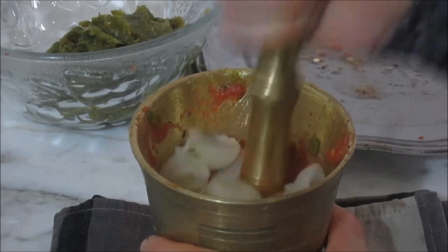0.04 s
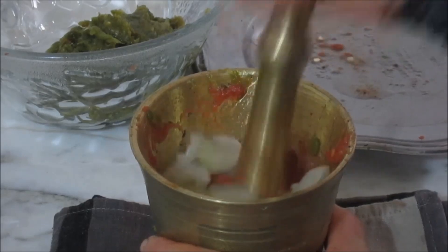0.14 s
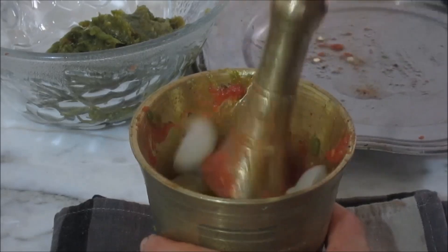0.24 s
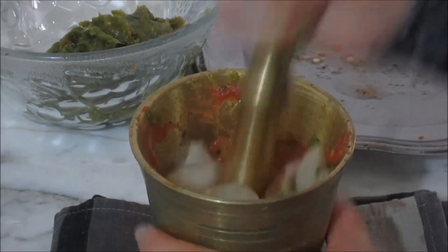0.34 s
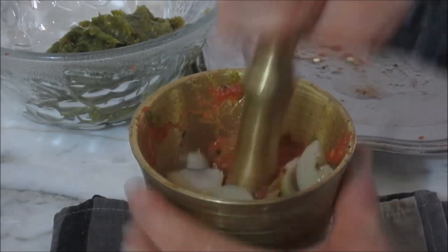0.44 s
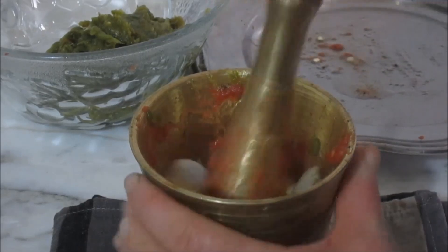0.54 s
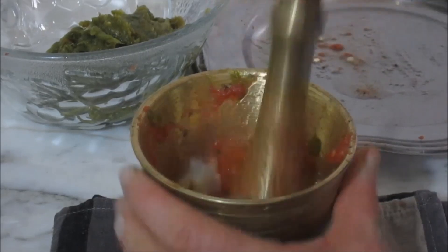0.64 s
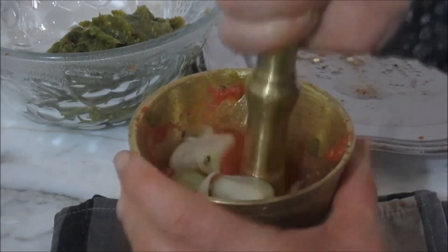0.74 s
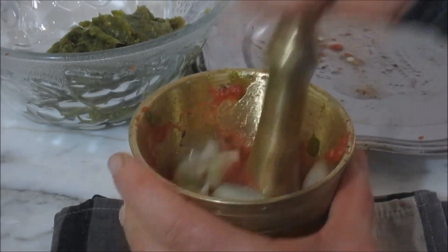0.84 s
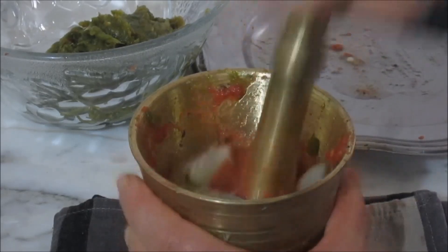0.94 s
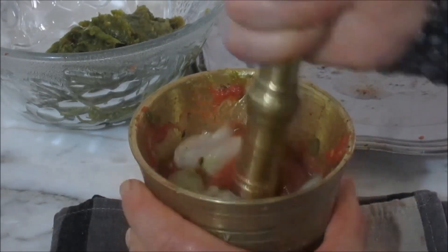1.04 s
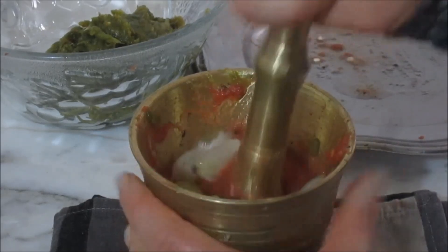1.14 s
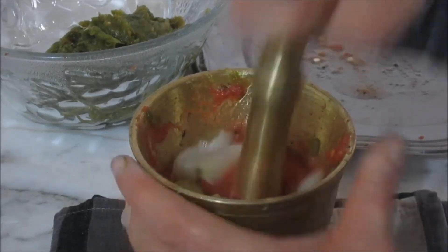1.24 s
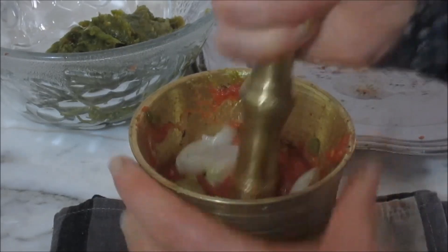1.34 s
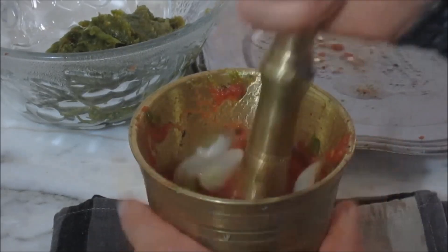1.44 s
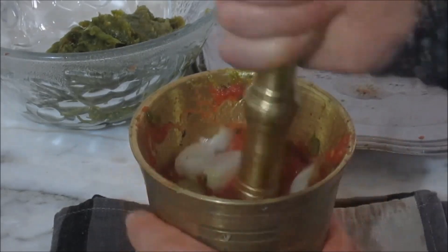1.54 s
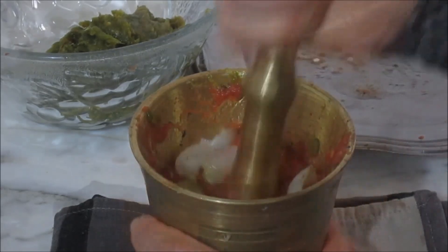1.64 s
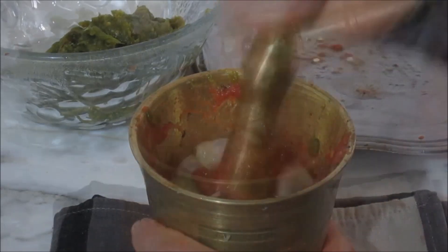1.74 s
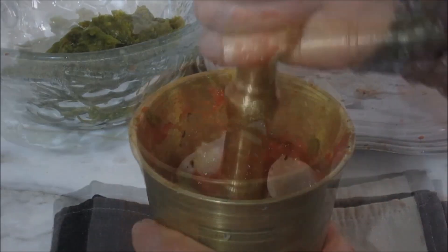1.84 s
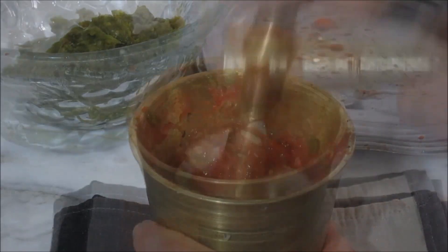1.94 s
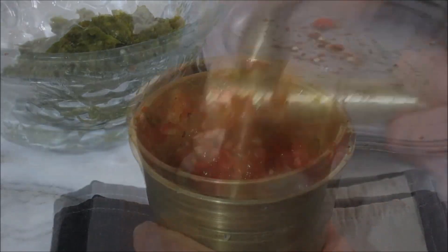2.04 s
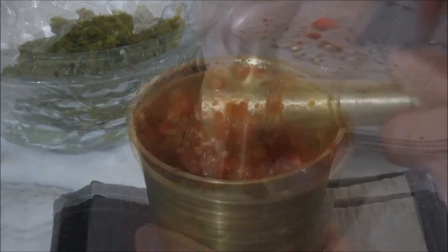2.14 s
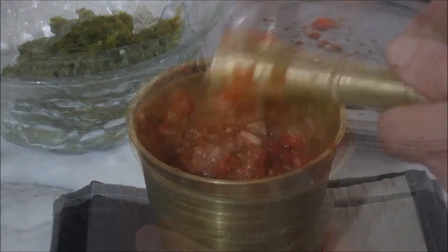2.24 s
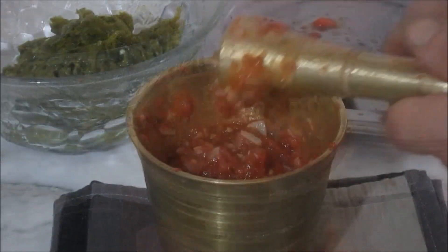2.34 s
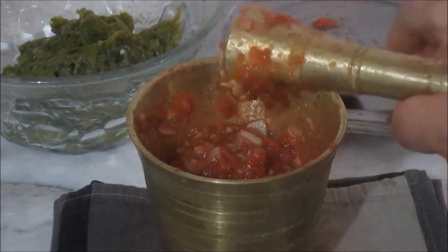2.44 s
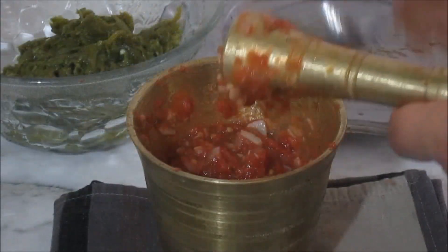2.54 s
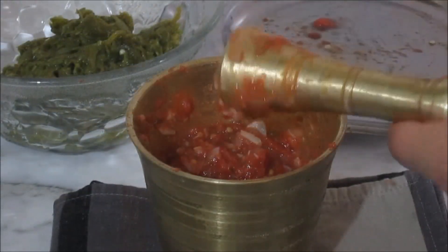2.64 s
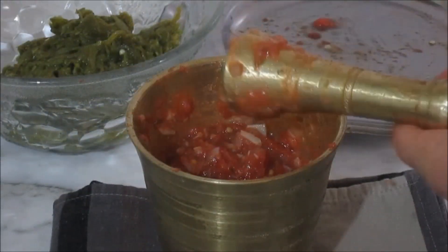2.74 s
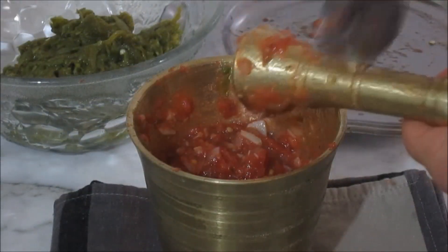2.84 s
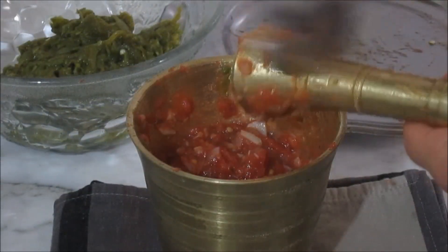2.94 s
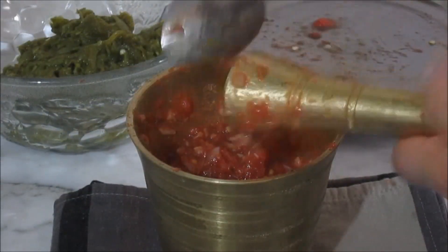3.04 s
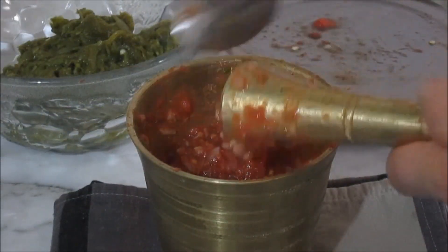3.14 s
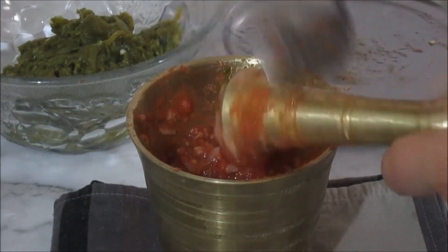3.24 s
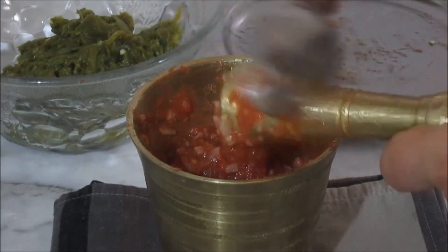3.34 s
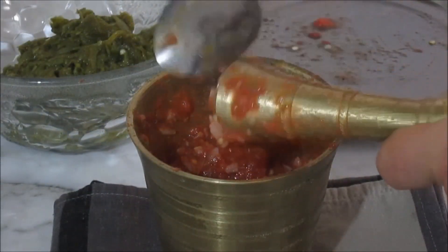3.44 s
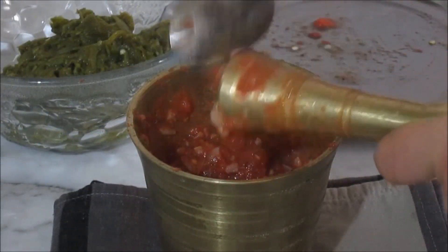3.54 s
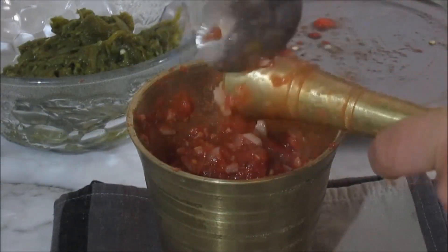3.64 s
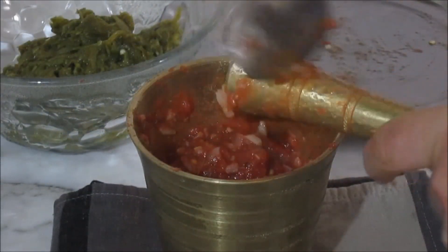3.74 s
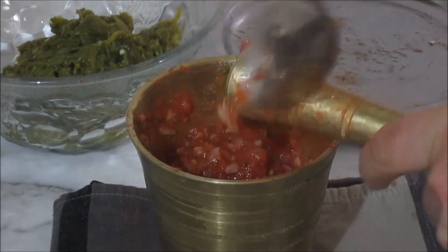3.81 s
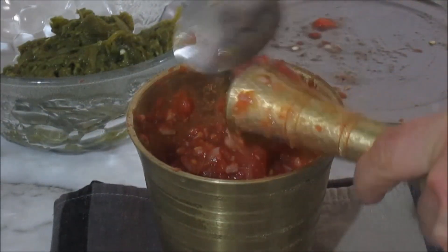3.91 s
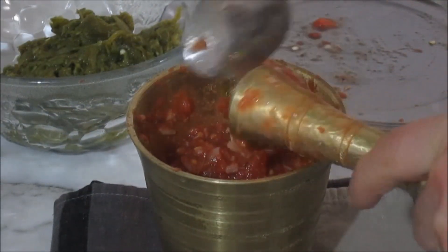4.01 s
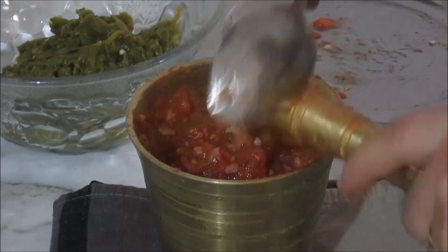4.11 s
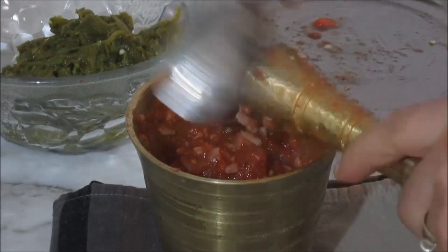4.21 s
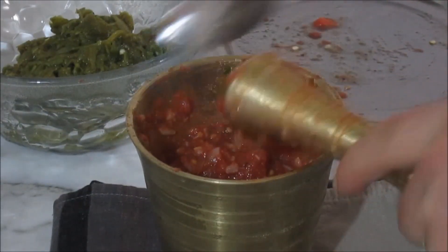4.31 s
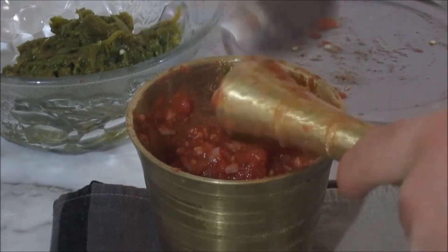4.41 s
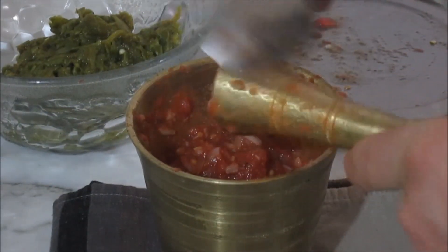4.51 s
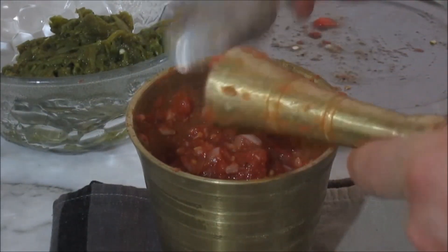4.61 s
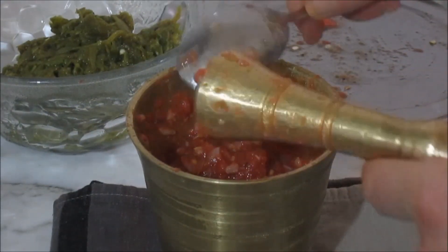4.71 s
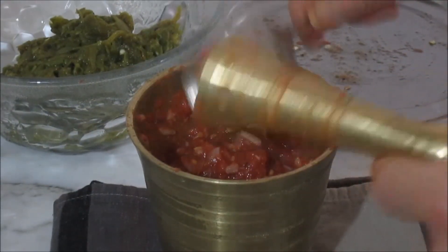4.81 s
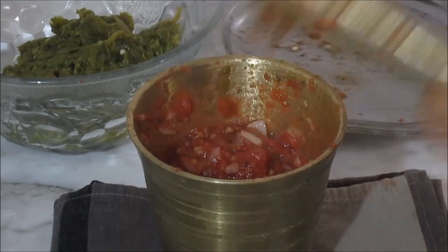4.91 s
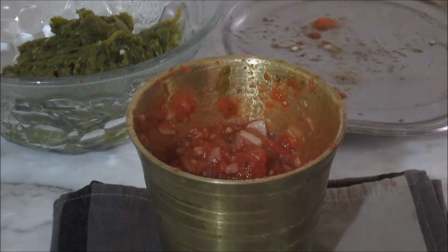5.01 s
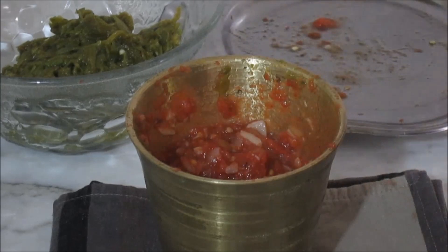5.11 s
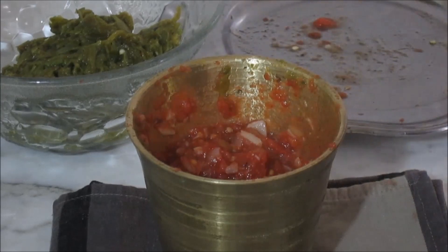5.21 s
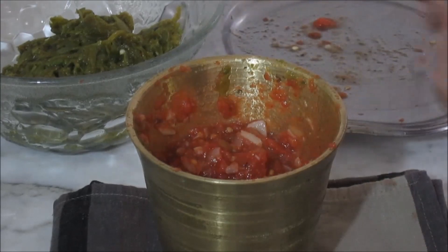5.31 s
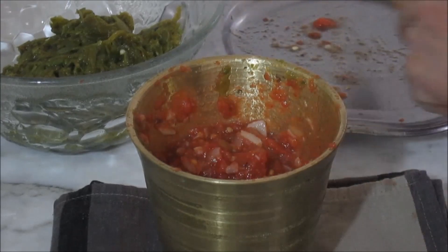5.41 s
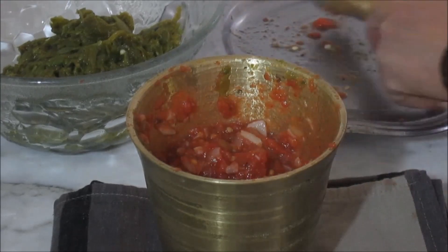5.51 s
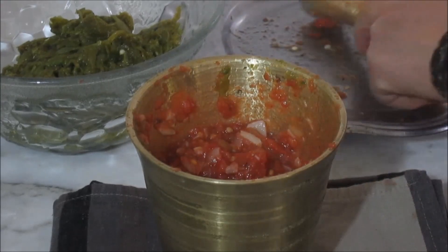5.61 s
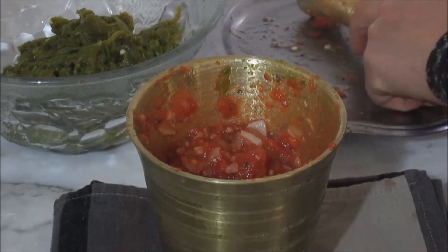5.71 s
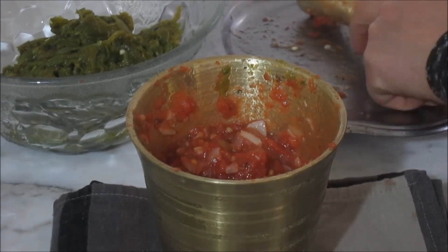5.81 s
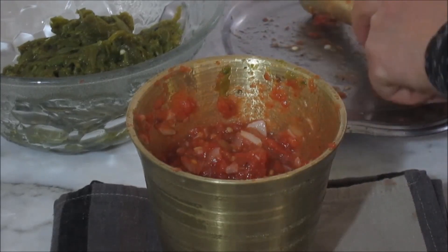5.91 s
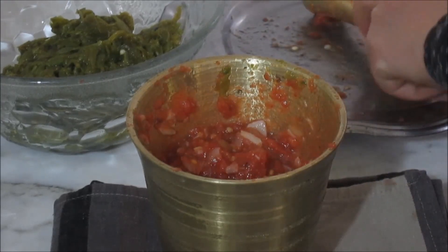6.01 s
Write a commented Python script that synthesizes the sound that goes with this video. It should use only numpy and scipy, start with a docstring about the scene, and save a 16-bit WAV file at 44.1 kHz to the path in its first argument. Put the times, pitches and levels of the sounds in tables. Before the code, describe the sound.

A brass pestle pounds vegetables in a brass mortar, giving about eight short, damped metallic knocks at a steady pace. After a momentary dip in level, the kitchen sounds closer, with a louder low appliance rumble. A spoon taps and scrapes the pestle in bright, irregular clinks with a brief squeak. Following a pause, the pestle lands on a steel tray with a short, ringing clatter.

```python
"""Mortar and pestle in a kitchen

A brass pestle pounds vegetables in a brass mortar on a cloth; after a brief dip in level the kitchen
is heard closer. A spoon taps and scrapes the pestle clean, and the pestle is laid on a steel tray that
clatters. Impact and friction excite the damped normal modes of each metal body, which sound into a
hard, reverberant room over a low appliance rumble."""
import sys
import numpy as np
from scipy import signal
from scipy.fft import rfft, irfft
from scipy.io import wavfile

SR = 44100
rng = np.random.default_rng(int(sys.argv[2]) if len(sys.argv) > 2 else 0)


def generate_wav(signal):
    """Clip the signal to [-1, 1] and save it as 16-bit WAV at the path in sys.argv[1]."""
    frames = np.transpose(np.atleast_2d(signal))
    scaled = np.clip(frames, -1, 1) * 32767
    pcm = np.round(scaled).astype(np.int16)
    wavfile.write(sys.argv[1], SR, pcm)


N = 267246
T = np.arange(N) / SR
CLOSER_S = 2.566  # end of the dip in level

# Modes of pestle and spoon ringing free. Each row: frequency in Hz, level in dB, T60 in seconds.
FREE_MODES = [(1120, 5, 0.016), (1967, 0.5, 0.041), (2730, -1, 0.0043), (2940, 0.5, 0.037),
              (3003, 9, 0.014), (3540, -5, 0.042), (4115, 5.5, 0.009), (4867, 3, 0.03), (5460, -4, 0.043),
              (5570, -3.5, 0.045), (6800, -11, 0.024), (7180, -8, 0.011), (8800, 7.5, 0.027),
              (9820, 3.5, 0.017), (11500, -22, 0.011), (12160, -10, 0.028), (13400, -10, 0.023),
              (14900, -45, .06)]
FREE_EDGES_HZ = [700, 2300, 4000, 7200]  # lower edges of the low, main, upper and top bands
# The weak, close modes of a body blur into a crack. Each entry: four band levels in dB against the
# clear modes, T60 in seconds, roll-off in Hz.
CRACKS = {"mortar": ([-2.3, -2.2, -2.9, -2.2], 0.0069, 4360), "rim": ([-2, -2, 12, 5], 0.024, 7500),
          "spoon": ([1.7, 3.4, 2.7, 0.83], 0.0021, 12900), "tray": ([0.5, -8, 2, 0], 0.098, 6400)}


def pestle():
    """Impact excitation: blows ring the damped mortar; light touches of metal tick faintly."""
    # The half-full mortar. Each row: frequency in Hz, level in dB, T60 in seconds.
    modes = [(227, -15.5, 0.031), (385, -11, 0.035), (488.6, -1, 0.03), (539, -8, 0.1), (650, -2.5, 0.014),
             (993, -2, 0.037), (1074, -2, 0.041), (1174.5, -0.5, 0.056), (1265, -0.5, .04),
             (1357, -4, 0.041), (1428, -3, 0.022), (1950, -8, 0.036), (2105, -4.5, 0.039),
             (2500, 4.5, 0.009), (2777, 0, 0.018), (3500, -12, 0.008), (4340, -17.5, 0.012),
             (5540, -5, 0.024), (6040, -0.8, 0.04), (6660, -1, 0.014), (7600, -7, 0.041),
             (8050, -10, 0.042), (10500, -28, .04), (13100, -36, .03)]
    # Each row: start in seconds, main-band peak in dB, then low, upper and top bands in dB against it.
    blows = [(0.049, -7.5, -1.5, -12, -17.5), (0.377, -7.5, 1, -6, -21), (0.695, -11.5, -17, -12.5, -35),
             (1.268, -5.5, 1.5, -11, -19), (1.538, -7, 2.5, -6, -13), (1.805, -9.5, -1.5, -13, -24.5),
             (2.077, -9, -1.5, -18, -34), (2.323, -8, 2.5, -1.5, -13.5)]
    touches = [(0.303, -43, -20, -7, -16), (0.341, -39.5, -24, -4.5, -4.5), (0.613, -48, -9, -2, -7),
               (0.642, -45, -25, -26, -31), (0.926, -34.5, -31, -17, -21), (5.355, -34.5, -22, 0.5, 2)]
    glances = [(0.695, -37.5, -16, 7, -5), (2.322, -22.5, -5, 5.5, -7)]
    # The pestle drags along the wall. Each row: start in seconds, hold in seconds, level in dB.
    drags = [(2.24, .03, -61), (2.275, 0.033, -49.5)]
    edges_hz = [300, 800, 1900, 4000]
    bowl, light_contact = (modes, edges_hz, CRACKS["mortar"]), (modes, edges_hz, CRACKS["rim"])
    out = impacts(blows, bowl, scatter_db=1.97, detune=0.017)
    out += impacts(touches, light_contact, scatter_db=3.5, detune=0.038)
    out += friction(drags, light_contact, bands_db=[-16, -8, 5, -8], slips_per_s=1500, spread_db=3.1,
                    scatter_db=3.1, detune=0.0073)
    free_pestle = FREE_MODES, FREE_EDGES_HZ, CRACKS["spoon"]  # glancing blows ring the pestle itself
    return out + impacts(glances, free_pestle, scatter_db=5.1, detune=0.041)


def spoon(low_band_db=-12):
    """Free vibration: spoon and pestle ring together under taps and scrapes."""
    # Each row: start in seconds, main-band peak in dB, then upper and top bands in dB against it.
    taps = [(2.879, -6.5, 3.5, -7.5), (2.9053, -15, 5.5, -4), (2.9628, -16.5, 4.5, -12),
            (2.9714, -16.5, 4, -13), (2.9772, -25, -2, -14), (2.998, -18, -2, -10), (3.0093, -17.5, -4, -4),
            (3.2957, -7.5, 3.5, -4.5), (3.3081, -18, 6, -16), (3.3901, -13.5, -5, -3.5),
            (3.3981, -12, 4.5, -12), (3.5141, -15.5, 3, -7.5), (3.8193, -11.5, 8.5, -3.5),
            (3.8507, -16, 2.5, -8), (3.868, -12.5, 5, -5), (4.019, -20.5, -2.5, -10), (4.1651, -12, 6, -7),
            (4.5116, -11, 3, -19), (4.5201, -17, 4, -7)]
    # The spoon's edge slides along the pestle. Each row: start in seconds, hold in seconds, level in dB.
    scrapes = [(2.94, 0.066, -28), (3.298, 0.0081, -26.5), (3.38, 0.042, -23), (3.82, 0.0071, -24.5),
               (3.87, 0.055, -24.5), (4.168, 0.059, -32.5), (4.515, 0.054, -28)]
    body = FREE_MODES, FREE_EDGES_HZ, CRACKS["spoon"]
    strikes = [(start, db, low_band_db, *upper_db) for start, db, *upper_db in taps]
    tapping = impacts(strikes, body, scatter_db=1.6, detune=0.006)
    scraping = friction(scrapes, body, bands_db=[-10, 2.5, 2.5, -8], slips_per_s=1100, spread_db=5.4,
                        scatter_db=1.6, detune=0.006)
    return tapping + scraping + spoon_singing()


def spoon_singing(roughness=0.53, flutter_hz=150):
    """Friction-induced vibration: a stuttering tone whose pitch slides with the contact point."""
    # Each row: start in seconds, hold in seconds, level in dB, first and last frequency in Hz.
    glides = [(3.3, 0.15, -31, 2680, 3000), (3.297, 0.017, -29, 3400, 5100),
              (3.345, 0.021, -26, 4900, 4400), (3.82, 0.087, -41.5, 2600, 15000)]
    out = np.zeros(N)
    for start, hold, level_db, first_hz, last_hz in glides:
        times, levels_db = stroke(start, hold, level_db)
        stutter = unit_rms(signal.lfilter(*signal.butter(2, flutter_hz, fs=SR), rng.standard_normal(N)))
        envelope = undb(np.interp(T, times, levels_db, left=-200, right=-200))
        hz = np.interp(T, times[[0, -1]], [first_hz, last_hz])
        out += envelope * (1 + roughness * stutter) * np.sin(2 * np.pi * np.cumsum(hz) / SR)
    return out


def tray():
    """Plate vibration: the steel tray is struck by the pestle, then rocks and chatters under it."""
    # Each row: frequency in Hz, level in dB, T60 in seconds.
    modes = [(262, -8, .03), (362, -1, 0.1), (485, 0, 0.037), (645, 9.5, 0.02), (808, -6, 0.48),
             (972, -4, .12), (1085, -9, 0.9), (1258, 0, 0.073), (1390, 14, 0.017), (1500, 2, 0.15),
             (1550, -1.5, 0.094), (1760, -3.5, 0.17), (1887, -26, 1), (2440, 3, 0.09), (2560, 5, 0.11),
             (3130, 7, 0.037), (3603, -1, 0.16), (4470, 8, 0.081), (4550, -1.5, 0.22), (5300, 6, 0.034),
             (6010, 4, 0.06), (6440, -3, 0.092), (7660, -10, 0.12), (8800, -13, 0.088), (9330, -2, 0.036),
             (11400, -30, .05), (13200, -30, .04)]
    # Each row: start in seconds, main-band peak in dB, then low, upper and top bands in dB against it.
    drops = [(5.6397, -5.5, -13.5, -7, -9.5), (5.677, -8, -2, -32, -22), (5.687, -6.5, -10, -21, -32),
             (5.7555, -5, -21, -0.5, -4)]
    # Each row: start in seconds, hold in seconds, level in dB.
    chatter = [(5.65, 0.043, -25.5), (5.752, 0.041, -20)]
    plate = modes, [220, 900, 2100, 4000], CRACKS["tray"]
    strikes = impacts(drops, plate, scatter_db=2.1, detune=0.0015)
    return strikes + friction(chatter, plate, bands_db=[-2.5, 6, 4, -10], slips_per_s=1300,
                              spread_db=3.8, scatter_db=2.1, detune=0.0015)


def impacts(events, body, scatter_db, detune):
    """Superposition: each blow adds the four bands of the body's response with its own weights."""
    out = np.zeros(N)
    for start, db, low_db, upper_db, top_db in events:
        gains = undb(db + np.array([low_db, 0, upper_db, top_db]))
        add(out, start, gains @ impulse_response(*body, scatter_db, detune))
    return out


def friction(strokes, body, bands_db, slips_per_s, spread_db, scatter_db, detune):
    """Stick-slip excitation: clicks of random time and size are convolved with the body's response."""
    out = np.zeros(N)
    for row in strokes:
        times, levels_db = stroke(*row)
        t = np.arange(times[0], times[-1], 1 / SR)
        slips = rng.random(N)[:len(t)] < slips_per_s / SR
        size, polarity = rng.standard_normal((2, N))[:, :len(t)]
        clicks = slips * undb(spread_db * size) * np.sign(polarity)
        force = unit_rms(clicks) * undb(np.interp(t, times, levels_db))
        response = undb(bands_db) @ impulse_response(*body, scatter_db, detune)
        add(out, times[0], signal.fftconvolve(force, response / np.linalg.norm(response)))
    return out


def stroke(start, hold, db, press_s=0.0078, release_db_per_s=684, fall_db=41):
    """Contact envelope: corner times and levels in dB as a stroke presses in, holds and lets go."""
    times = start + np.cumsum([0, press_s, hold, fall_db / release_db_per_s])
    return times, db - np.array([fall_db / 2, 0, 0, fall_db])


def impulse_response(modes, edges_hz, crack, scatter_db, detune, contact_click=4.23):
    """Modal overlap: in each of four bands, clear modes ring over dense ones heard as decaying noise."""
    crack_db, t60, rolloff_hz = crack
    partials = damped_modes(modes, scatter_db, detune)
    band_of_mode = np.digitize(np.array(modes)[:, 0], edges_hz[1:])
    length = partials.shape[1]
    noise = rng.standard_normal(length) + contact_click * signal.unit_impulse(length)
    noise = signal.lfilter(*signal.butter(2, rolloff_hz, fs=SR), noise)
    noise *= 1000. ** (-T[:length] / t60)
    bands = []
    for i, limits_hz in enumerate(zip(edges_hz, edges_hz[1:] + [16000])):
        clear = unit_peak(partials[band_of_mode == i].sum(axis=0))
        blurred = unit_peak(butterworth(noise, 3, limits_hz, "bandpass"))
        bands.append(unit_peak(clear + undb(crack_db[i]) * blurred))
    return bands


def damped_modes(modes, scatter_db=0., detune=0., rise_cycles=0.58):
    """Exponential decay: one sine per mode, with optional random scatter in level and pitch."""
    hz, db, t60 = np.transpose(modes)[:, :, None]
    t = T[:int(SR * min(t60.max(), 4))]
    level, pitch, polarity = rng.standard_normal((3, len(hz), 1))
    amplitude = undb(db + scatter_db * level) * np.sign(polarity)
    envelope = 1000. ** (-t / t60) * (1 - np.exp(-t * hz / rise_cycles))
    return amplitude * np.sin(2 * np.pi * hz * (1 + detune * pitch) * t) * envelope


def kitchen(x, source, delay_s=0.0044, build_s=0.0019):
    """Reverberation: direct sound, a reflection off the counter, then dense echoes that build and fade."""
    # Each row: frequency in Hz, reverberation time T60 in seconds.
    decay_times = [(100, 0.18), (300, 0.41), (520, 0.5), (1000, 0.5), (2800, 0.48), (7300, 0.46),
                   (15000, 0.12)]
    # Each entry: a source's counter reflection, or its diffuse tail, in dB against the direct sound.
    counter_db = {"mortar": -5, "spoon": -8.5, "tray": -7}
    tail_db = {"mortar": -2, "spoon": -2, "tray": 0.5}
    direct = butterworth(x, 4, 150, "highpass")  # high-pass keeps deep bass out of the strikes
    decay_hz, decay_s = np.transpose(decay_times)
    t, tail = T[:SR], np.zeros(SR)
    for hz in 90 * 2 ** np.arange(0, 7.6, 0.5):  # half-octave bands
        t60 = np.interp(np.log(hz), np.log(decay_hz), decay_s)
        envelope = 1000. ** (-t / t60) * (1 - np.exp(-t / build_s))
        tail += np.sqrt(hz) * narrowband_noise(hz, hz / 3)[:SR] * envelope / np.linalg.norm(envelope)
    echoes = signal.fftconvolve(direct, tail / np.linalg.norm(tail))[:N]
    out = direct.copy()
    add(out, delay_s, undb(counter_db[source]) * direct + undb(tail_db[source]) * echoes)
    return out


def lingering_ring():
    """Free decay: a faint metal ring dies away after the dip in level."""
    # Each row: frequency in Hz, level in dB, T60 in seconds.
    modes = [(1420, -46, 0.56), (1923, -49, 1.5), (3300, -59.5, 1)]
    out = np.zeros(N)
    add(out, CLOSER_S, damped_modes(modes).sum(axis=0))
    return out


def appliance_rumble():
    """Broadband and narrowband noise: a low rumble carries a wavering hum and whine."""
    # Each row: frequency in Hz, relative spectral density in dB.
    spectrum = [(15, -37.5), (25, -1), (71, -11.5), (146, -5), (176, -9), (335, -7.5), (363, -9.5),
                (588, -7.5), (1670, -26), (1860, -31), (2180, -27), (2500, -38.5), (2700, -28.5),
                (4260, -36.5), (8000, -45), (15000, -66)]
    # Each row: centre in Hz, width in Hz, level in dB against the rumble.
    hum_bands = [(144.3, 5.8, -5.5), (237, 16, -11), (2404, 25, -22), (4280, 88, -28.5)]
    # Each row: time in seconds, rumble level in dB.
    levels = [(0, -46), (1.2, -52.5), (2.53, -49.5), (2.545, -56), (2.56, -39.5), (2.57, -40.5), (4.0, -42),
              (6.06, -40)]
    spectrum_hz, spectrum_db = np.transpose(spectrum)
    bins_hz = np.maximum(np.fft.rfftfreq(N, 1 / SR), 1)
    colour = undb(np.interp(np.log(bins_hz), np.log(spectrum_hz), spectrum_db))
    rumble = unit_rms(irfft(rfft(rng.standard_normal(N)) * colour, N))
    hum = sum(undb(db) * narrowband_noise(hz, width) for hz, width, db in hum_bands)
    return (rumble + hum) * undb(np.interp(T, *np.transpose(levels)))


def narrowband_noise(hz, width_hz):
    """Resonance: a single peak selects one band from white noise."""
    return unit_rms(signal.lfilter(*signal.iirpeak(hz, hz / width_hz, SR), rng.standard_normal(N)))


def butterworth(x, order, hz, kind):
    return signal.sosfilt(signal.butter(order, hz, kind, fs=SR, output="sos"), x)


def undb(db):
    return 10 ** (np.asarray(db) / 20)


def unit_rms(x):
    return x / np.sqrt(np.mean(x ** 2))


def unit_peak(x):
    return x / np.abs(x).max()


def add(out, start_s, x):
    i = int(start_s * SR)
    out[i:i + len(x)] += x[:N - i]


def scene():
    """Superposition: pounding, then spoon and tray, sound in the kitchen over the rumble."""
    pounding = kitchen(pestle() * (T < CLOSER_S), "mortar")
    pounding *= np.interp(T, [2.5, 2.545], [1, 0])  # the dip in level cuts the last echo
    cleaning = kitchen(pestle() * (T > CLOSER_S) + spoon(), "spoon")
    clatter = kitchen(tray(), "tray")
    return (pounding + cleaning + clatter + appliance_rumble() + lingering_ring())[None]


def record(dry, bass_hz=44, top_hz=16000, drive=0.6):
    """Band limiting and soft saturation: the microphone path has two narrow dips and rounds the peaks."""
    # Each row: centre in Hz, width in Hz.
    notches = [(4000, 186), (8000, 130)]
    x = butterworth(dry, 3, bass_hz, "highpass")
    for hz, width in notches:
        x = signal.lfilter(*signal.iirnotch(hz, hz / width, SR), x)
    rounded = np.tanh(drive * x) / drive
    return signal.sosfilt(signal.ellip(8, 0.2, 70, top_hz, fs=SR, output="sos"), rounded)


dry = scene()
out = record(dry)
generate_wav(out)
```